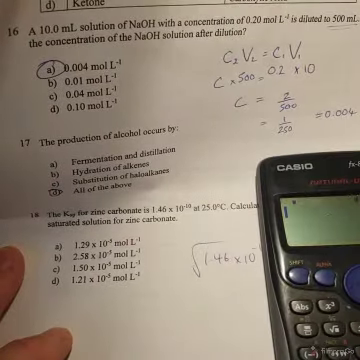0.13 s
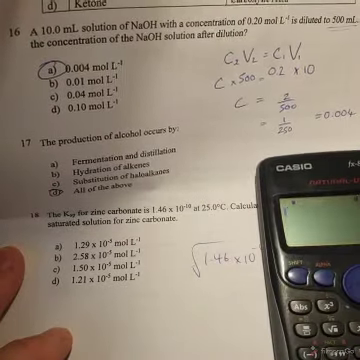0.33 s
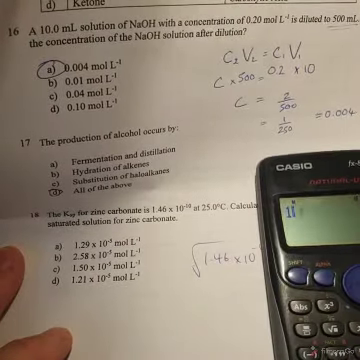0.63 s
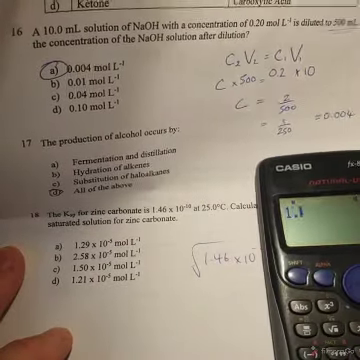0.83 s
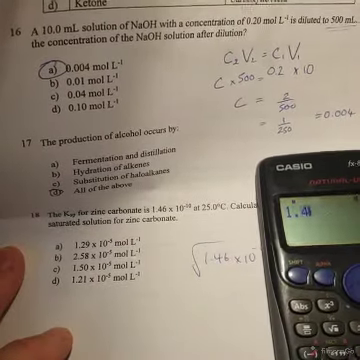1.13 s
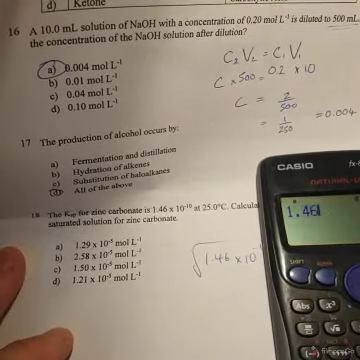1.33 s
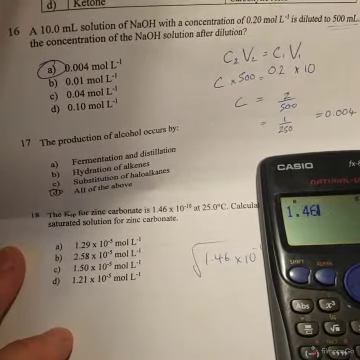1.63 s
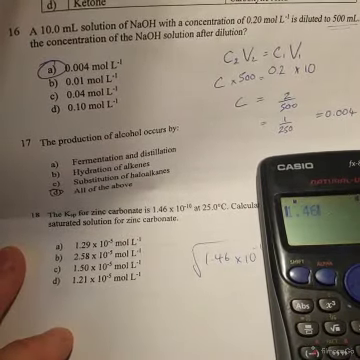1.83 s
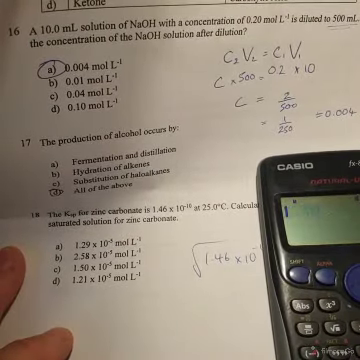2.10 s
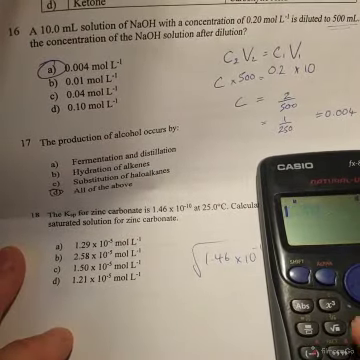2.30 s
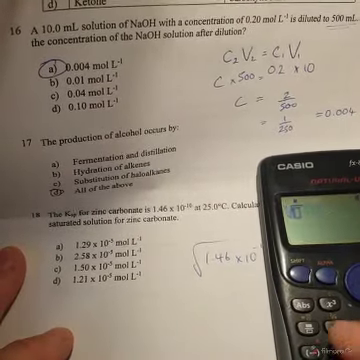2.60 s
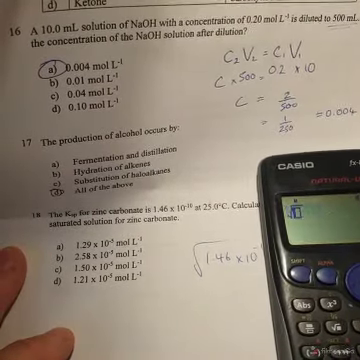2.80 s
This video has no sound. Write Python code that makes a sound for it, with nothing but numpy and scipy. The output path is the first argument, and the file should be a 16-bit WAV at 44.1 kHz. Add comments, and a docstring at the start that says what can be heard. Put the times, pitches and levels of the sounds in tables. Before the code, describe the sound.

Plastic calculator keys are pressed close by, slightly to the right. Four short clacks come at about 0.4, 0.6, 0.9 and 1.2 seconds, each with a light desk thud and a dull release knock. A much softer tap follows at 1.7 seconds, then a faint handling rumble around 2.1. One last clear press lands at 2.6 seconds. The small room rings briefly, with faint hiss underneath.

```python
"""A desk in a small, quiet room: keys of a plastic calculator are pressed close by, a little to the right.
Each key ticks as the finger meets it, bottoms out with a clack that rings the case and thuds into
the desk, and comes back up with a dull knock as its rubber dome pushes it.
The room rings on; under it lie a faint hiss and a low handling rumble."""
import sys
import numpy as np
from scipy import signal
from scipy.fft import rfft, irfft, next_fast_len
from scipy.io import wavfile

SR = 44100
rng = np.random.default_rng(int(sys.argv[2]) if len(sys.argv) > 2 else 0)


def store_wav(level_fs):
    """Save 16-bit WAV to argv[1]."""
    pcm = np.round(np.clip(np.atleast_2d(level_fs), -1, 1) * 32767)
    wavfile.write(sys.argv[1], SR, pcm.T.astype(np.int16))


N = 130095
HIT_SAMPLES = 2 ** 15
AGE_S = np.arange(HIT_SAMPLES) / SR


def from_db(db):
    """Decibels to gain."""
    return 10 ** (np.asarray(db) / 20)


def at_hz(points, hz):
    """Read a table on a log-frequency axis."""
    knots_hz, values = np.transpose(points)
    return np.interp(np.log(np.maximum(hz, 1)), np.log(knots_hz), values)


def rise(rise_s):
    """Linear onset of a hit."""
    return np.minimum(AGE_S / rise_s, 1)


def decay(age_s, t60_s):
    """Exponential decay."""
    return from_db(-60 * age_s / t60_s)


def pan(db):
    """Stereo gains for a level difference, left minus right."""
    return from_db(np.array([np.atleast_1d(db), -np.atleast_1d(db)]) / 2)


def soften(x, hz):
    """Second-order low-pass."""
    return signal.sosfilt(signal.butter(2, min(hz, SR * 2 / 5), fs=SR, output="sos"), x + 1e-18)


def add(track, start_s, sound):
    """Mix a sound into a track."""
    start = int(start_s * SR)
    track[..., start:start + sound.shape[-1]] += sound[..., :N - start]


def ring(modes, pitch=1):
    """Struck modes of alternating sign."""
    return sum((-1) ** k * from_db(db) * decay(AGE_S, t60_s) * np.sin(2 * np.pi * hz * pitch * AGE_S)
               for k, (hz, db, t60_s) in enumerate(modes))


# Each row: frequency in Hz, left-right correlation.
STEREO_CORRELATION = [(100, 0.81), (350, 0.82), (700, .6), (1200, .15), (3000, .1), (15000, .1)]

def noise(spectrum, size):
    """Coloured stereo noise of rms 1, alike in the bass and nearly unrelated in the treble."""
    hz = np.fft.rfftfreq(size, 1 / SR)
    mid, side = np.exp(2j * np.pi * rng.random((2, len(hz))))
    alike = np.clip(at_hz(STEREO_CORRELATION, hz), -1, 1)
    white = np.sqrt(1 + alike) * mid + np.sqrt(1 - alike) * side * [[1], [-1]]
    x = irfft(white * from_db(at_hz(spectrum, hz)), size)
    return x / x.std()


# Noise spectra. Each row: frequency in Hz, relative density in dB.
FLOOR_SPECTRUM = [(20, -20.5), (45, -1), (65, 0), (120, -3), (200, -18.5), (400, -23.5), (1000, -27),
                  (3000, -32.5), (7000, -33.5), (8700, -42.5), (12000, -31), (16000, -35.5)]
RUMBLE_SPECTRUM = [(25, -14), (70, -4), (130, 0), (280, -12.5), (450, -28.5), (1200, -75), (8000, -58)]

def background(floor_db=-67.5, rumble_db=-55, swell_at_s=2.14, swell_width_s=0.11):
    """Steady room noise and hiss, with one soft swell of handling rumble."""
    floor = from_db(floor_db) * noise(FLOOR_SPECTRUM, N)
    swell = np.exp(-((np.arange(N) / SR - swell_at_s) / swell_width_s) ** 2)
    return floor + from_db(rumble_db) * swell * noise(RUMBLE_SPECTRUM, N)


# Each row: frequency in Hz, level in dB, T60 in seconds.
STANDING_MODES = [(134.8, -22.5, 0.45)]

def standing_wave():
    """A low room mode builds up and rings on."""
    return ring(STANDING_MODES) * rise(0.017)


# Each row: frequency in Hz, tail gain in dB.
TAIL_GAIN_DB = [(60, 0), (130, 6), (270, 0), (450, 0.5), (800, -7.5), (1500, -7), (3000, -7.5),
                (6000, -4.5), (11000, -6), (16000, -11)]
# Each row: frequency in Hz, T60 in seconds.
TAIL_T60_S = [(100, .55), (300, 0.29), (1000, 0.27), (2500, 0.26), (6000, 0.25), (14000, .25)]
# Each row: frequency in Hz, emphasis of the early tail in dB.
TAIL_BLOOM_DB = [(100, 1), (350, 6), (900, -2.5), (2000, -8), (8000, -1)]

def room_tails(sounds, onset_s=0.0016, build_s=0.005, bloom_s=0.03):
    """Each sound's energy returns in half-octave bands as a diffuse tail; the lows die last."""
    hz = np.fft.rfftfreq(HIT_SAMPLES, 1 / SR)
    edges_hz = 33 * 2 ** np.arange(0, 9.5, 0.5)[:, None]
    centre_hz = np.sqrt(edges_hz[:-1] * edges_hz[1:])
    in_band = (hz >= edges_hz[:-1]) & (hz < edges_hz[1:])
    build = np.clip((AGE_S - onset_s) / build_s, 0, 1)
    bloom = from_db(at_hz(TAIL_BLOOM_DB, centre_hz) * np.exp(-AGE_S / bloom_s))
    envelopes = build * decay(AGE_S, at_hz(TAIL_T60_S, centre_hz)) * bloom
    tails = []
    for sound in sounds:
        sound_energy = in_band @ np.mean(np.abs(rfft(sound)) ** 2, axis=0) * 2 / HIT_SAMPLES
        white = noise([(1, 0), (SR, 0)], HIT_SAMPLES)
        bands = irfft(rfft(white)[:, None] * in_band, HIT_SAMPLES) * envelopes
        band_energy = np.sum(bands ** 2, axis=-1, keepdims=True)
        gains = from_db(at_hz(TAIL_GAIN_DB, centre_hz)) * np.sqrt(sound_energy[:, None] / band_energy)
        tails.append(np.sum(gains * bands, axis=1))
    return tails


# Walls and ceiling. Each row: delay in seconds, level in dB.
FIRST_ECHOES = [(0.0111, -12.5), (0.0161, -11), (.0205, -13.5), (0.0307, -11.5)]
# Each row: frequency in Hz, left minus right in dB.
BALANCE_DB = [(100, -4.5), (600, -3), (1200, -3), (2500, -6.5), (7000, -5.5), (10000, -10), (13000, 3)]

def near_field(x, desk_echo_s=0.0022, desk_echo_db=-14.5, wall_cut_hz=1100, left_lag_s=0.00024):
    """Direct sound plus desk and wall echoes, later and mostly weaker at the left microphone."""
    size = next_fast_len(N + HIT_SAMPLES)
    hz = np.fft.rfftfreq(size, 1 / SR)
    phase_per_s = -2j * np.pi * hz
    desk = from_db(desk_echo_db) * np.exp(phase_per_s * desk_echo_s)
    walls = sum(from_db(db) * np.exp(phase_per_s * delay_s) for delay_s, db in FIRST_ECHOES)
    walls /= 1 + 1j * hz / wall_cut_hz
    mics = pan(at_hz(BALANCE_DB, hz)) * np.exp(phase_per_s * np.array([[left_lag_s], [0]]))
    return irfft(rfft(x, size) * (1 + desk + walls) * mics, size)[:, :N]


def chatter(spectrum, hold_s, t60_s):
    """Hard plastic parts chatter for a few milliseconds: a noise burst, equal in energy on both sides."""
    envelope = rise(0.0012) * decay(np.maximum(AGE_S - hold_s, 0), t60_s)
    burst = noise(spectrum, HIT_SAMPLES) * envelope
    return burst * np.sqrt(np.mean(envelope ** 2) / np.mean(burst ** 2, axis=1, keepdims=True))


# Each row: frequency in Hz, relative density in dB.
TICK_SPECTRUM = [(200, -14), (800, 2.5), (2000, 7.5), (3500, 0), (5000, 2.5), (7000, 1.5), (8700, -18),
                 (11500, -5), (16000, -20.5)]

def tick():
    """A loose key ticks against its slot."""
    return chatter(TICK_SPECTRUM, hold_s=0.0013, t60_s=0.013)


# Each row: frequency in Hz, relative density in dB.
CRACK_SPECTRUM = [(200, -19.5), (700, 9.5), (1500, 5.5), (3300, -3), (5000, -9), (7000, -11.5), (8700, -28),
                  (11000, -11), (16000, -21.5)]

def crack():
    """Plastic strikes plastic at the end of the key's travel."""
    return chatter(CRACK_SPECTRUM, hold_s=0.0033, t60_s=0.019)


# Case and desk modes. Each row: frequency in Hz, level in dB, T60 in seconds.
CASE_RESONANCES = [(360.2, -13, 0.078), (538, -11.5, 0.034), (763.6, -6, 0.021), (1040, -1.5, .014),
                   (1600, -12.5, .011), (2120, -9, .009), (3280, -12, 0.015), (6500, -25, .005)]
DESK_RESONANCES = [(46.75, -24.5, .22), (74.1, -28, 0.39), (132.3, -18.5, .08), (215, -20.5, .06)]

def press(crack_db, thud_db, pitch, hardness_hz):
    """The key hits bottom: the case rings, the plastic cracks, the desk thuds."""
    case = ring(CASE_RESONANCES, pitch) * rise(0.0005)
    clack = case + from_db(crack_db - 10) * crack()
    return soften(clack, hardness_hz) + from_db(thud_db) * ring(DESK_RESONANCES)


def release(crack_db=-26.5, thud_db=-4):
    """The rubber dome pushes the key back: a soft, slower blow on the same body."""
    case = soften(ring(CASE_RESONANCES, pitch=0.95), hz=956.4)
    thud = from_db(thud_db) * ring(DESK_RESONANCES)
    return (case + thud + from_db(crack_db) * crack()) * rise(0.0019)


# Each row: start in seconds, level in dB, crack, thud and room trims in dB, case pitch factor,
# contact hardness as a low-pass cutoff in Hz.
KEY_PRESSES = [(0.3749, -15.5, 1, -0.5, 0.5, 1.03, 14000), (0.6175, -15.5, 2.5, 1.5, 1, 0.99, 13800),
               (0.9018, -11.5, 1.5, 1.5, -1.5, .97, 14600), (0.9249, -14, -3.5, -0.5, -1, .8, 3000),
               (1.161, -11, 3.5, 0.5, -0.5, 1.0, 14000), (1.7442, -31.5, -3, 10.5, 0, 1.123, 2550),
               (2.552, -12, -1.5, 0.5, 0.5, 0.99, 13000), (2.5585, -12.5, 5, -4, 0, 0.8, 13320)]
# Each row: start in seconds, level in dB.
KEY_RELEASES = [(0.4912, -31.5), (0.7505, -27.5), (1.0122, -27.5), (1.2752, -28), (2.6561, -26)]
KEY_TICKS = [(0.3668, -35), (0.4340, -49.5), (0.4520, -45.5), (0.6245, -33), (0.7025, -51), (0.8958, -37.5),
             (0.9710, -33.5), (1.1510, -37), (1.2270, -40), (1.7383, -57), (1.7495, -43), (1.8220, -55),
             (1.8295, -45.5)]

def keys(tick_room_db=-5):
    """Direct and room tracks of all key sounds; only presses and releases drive the standing wave."""
    direct, wet = np.zeros((2, 2, N))
    hits = [(start_s, db, room_db, press(crack_db, thud_db, pitch, hardness_hz))
            for start_s, db, crack_db, thud_db, room_db, pitch, hardness_hz in KEY_PRESSES]
    hits += [(start_s, db, 0, release()) for start_s, db in KEY_RELEASES]
    standing = standing_wave()
    for start_s, db, room_db, _ in hits:
        add(wet, start_s, from_db(db + room_db) * standing)
    hits += [(start_s, db, tick_room_db, tick()) for start_s, db in KEY_TICKS]
    tails = room_tails([sound for *_, sound in hits])
    for (start_s, db, room_db, sound), tail in zip(hits, tails):
        add(direct, start_s, from_db(db) * sound)
        add(wet, start_s, from_db(db + room_db) * tail)
    return direct, wet


def scene():
    """The calculator close by; room sound and background lean slightly right."""
    direct, wet = keys()
    return near_field(direct) + pan(db=-2) * (wet + background())


def record(dry):
    """The microphone thins the deep bass; the top is cut steeply."""
    low_cut_hz, high_cut_hz = 45, 16200
    thinned = signal.sosfilt(signal.butter(1, low_cut_hz, "high", fs=SR, output="sos"), dry)
    return signal.sosfilt(signal.ellip(10, 0.1, 70, high_cut_hz, fs=SR, output="sos"), thinned)


dry = scene()
out = record(dry)
store_wav(out)
```